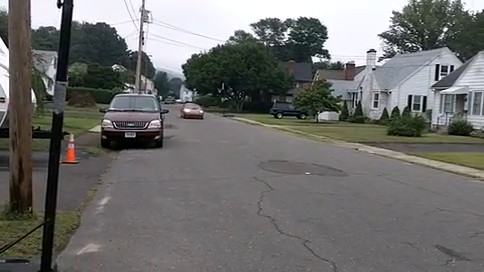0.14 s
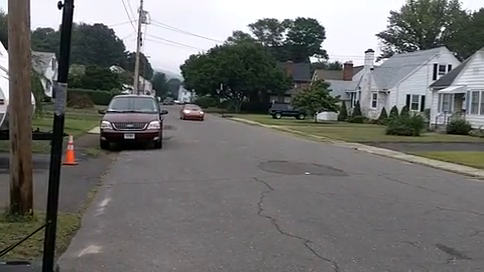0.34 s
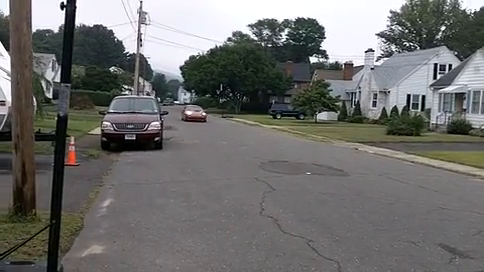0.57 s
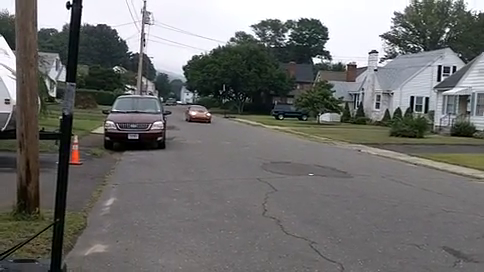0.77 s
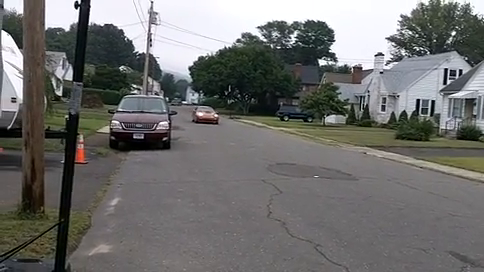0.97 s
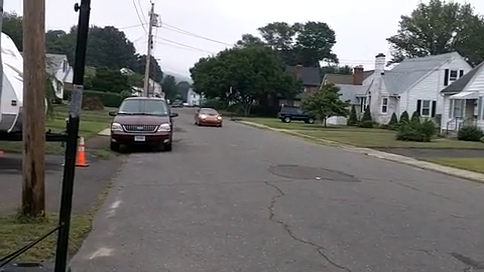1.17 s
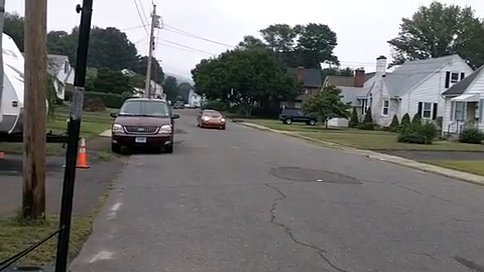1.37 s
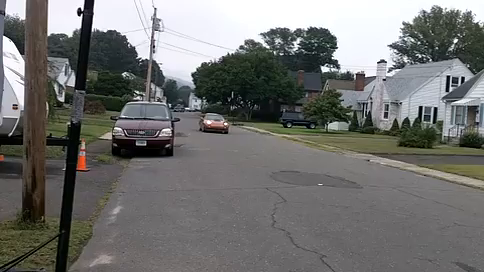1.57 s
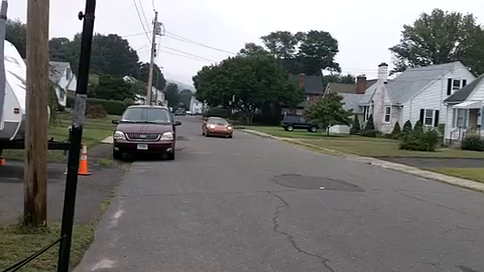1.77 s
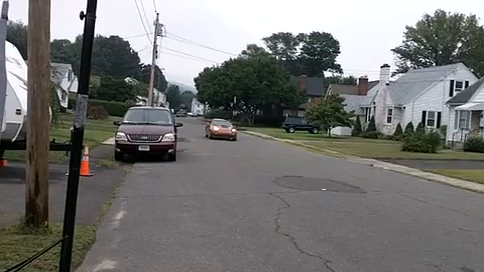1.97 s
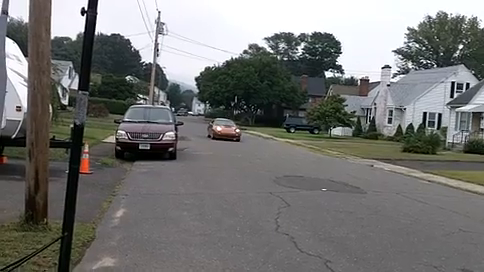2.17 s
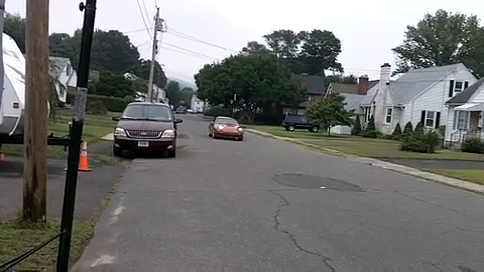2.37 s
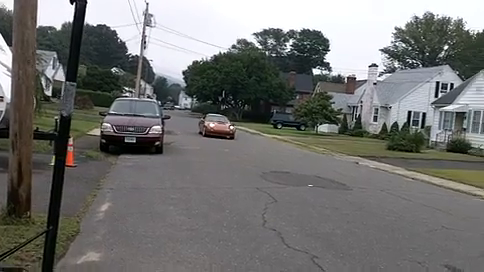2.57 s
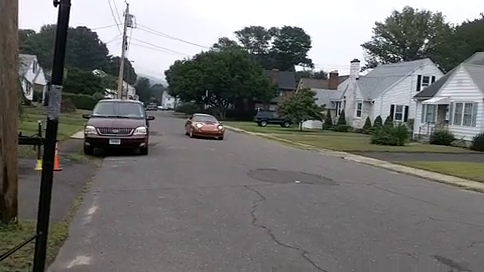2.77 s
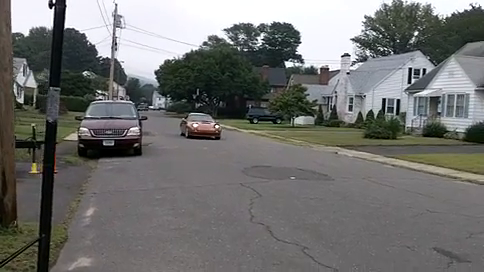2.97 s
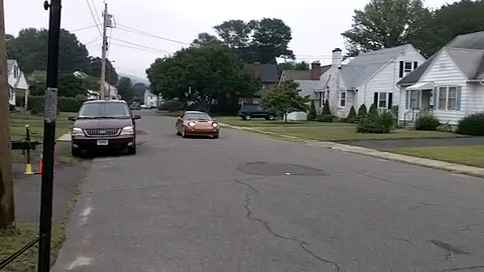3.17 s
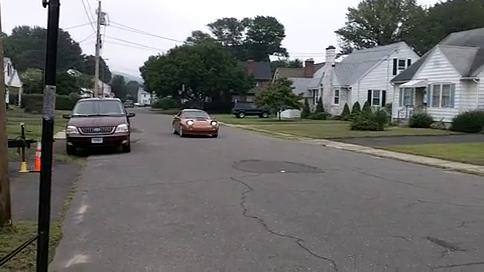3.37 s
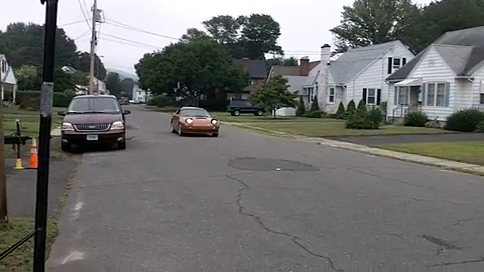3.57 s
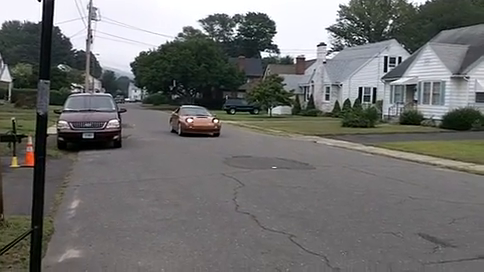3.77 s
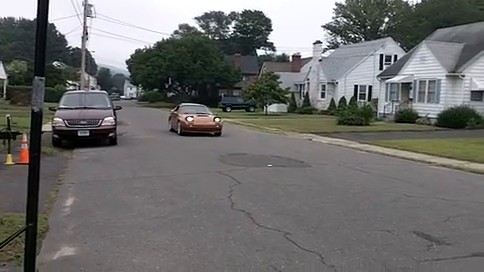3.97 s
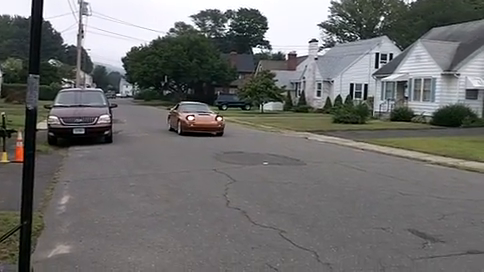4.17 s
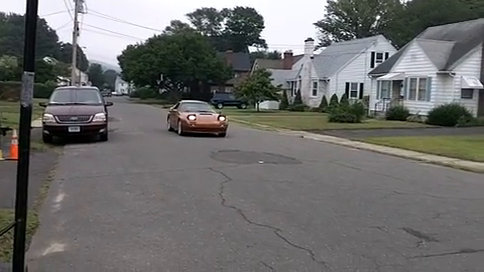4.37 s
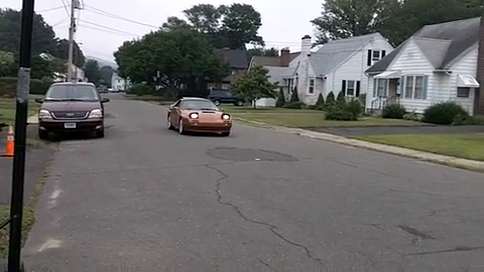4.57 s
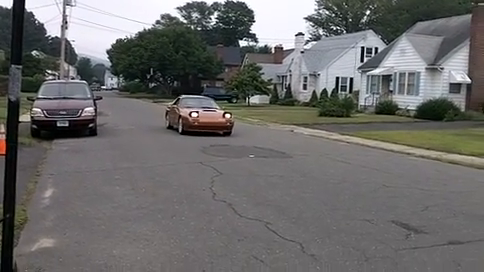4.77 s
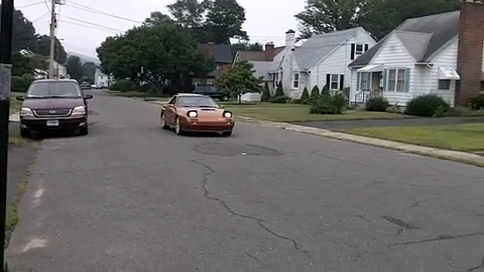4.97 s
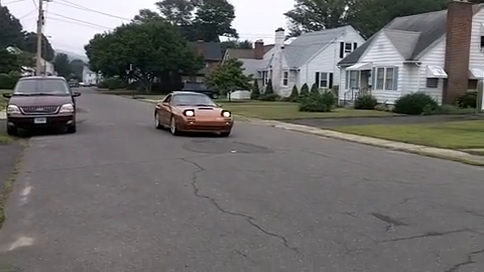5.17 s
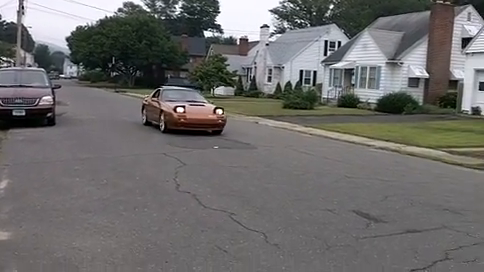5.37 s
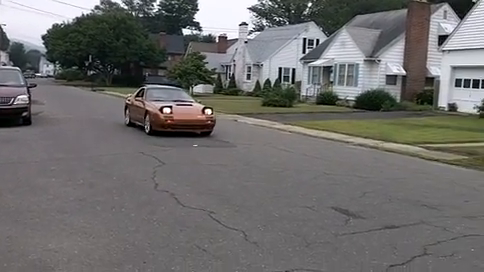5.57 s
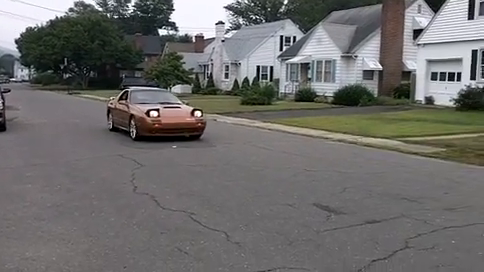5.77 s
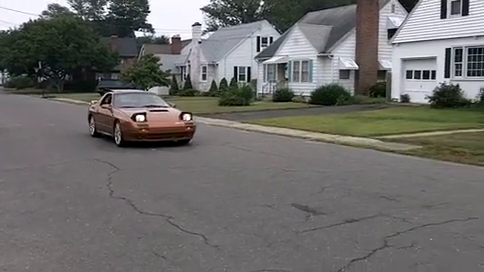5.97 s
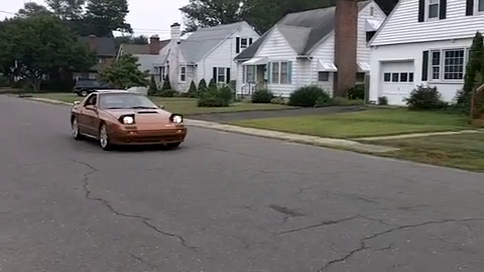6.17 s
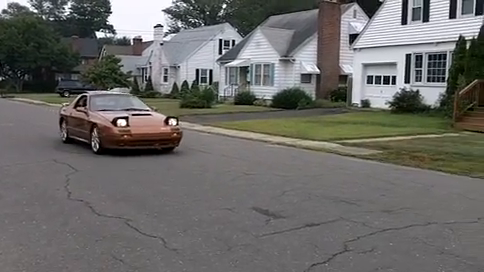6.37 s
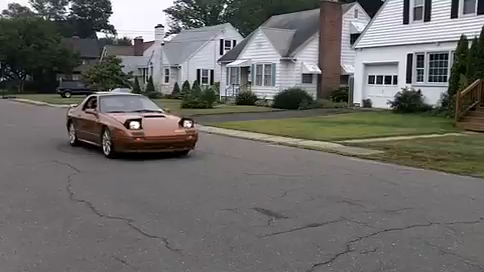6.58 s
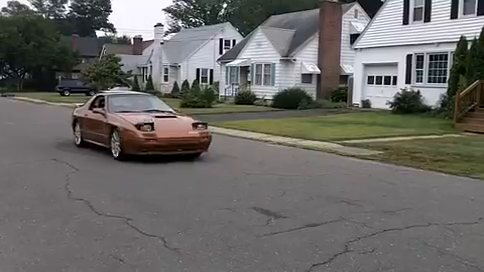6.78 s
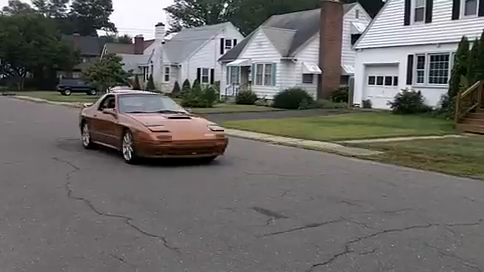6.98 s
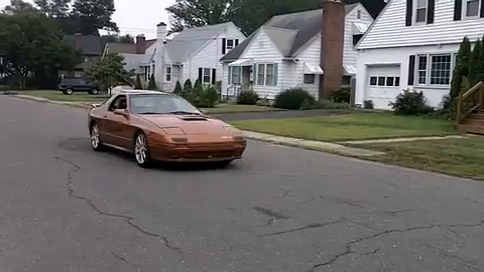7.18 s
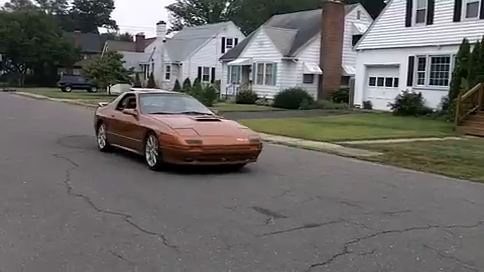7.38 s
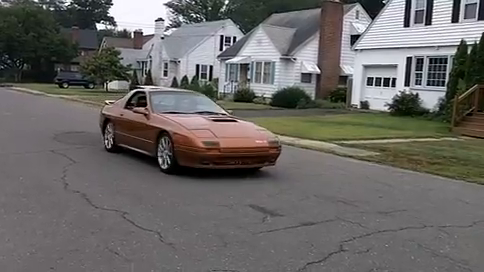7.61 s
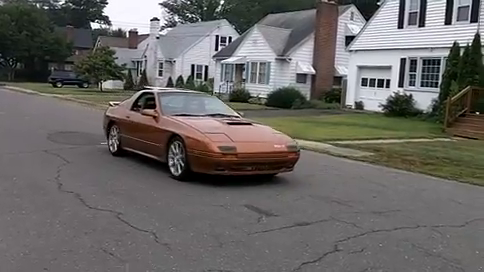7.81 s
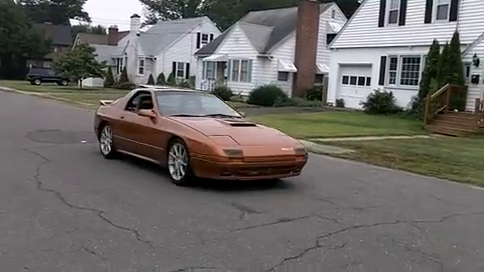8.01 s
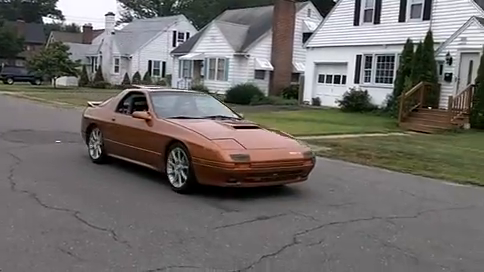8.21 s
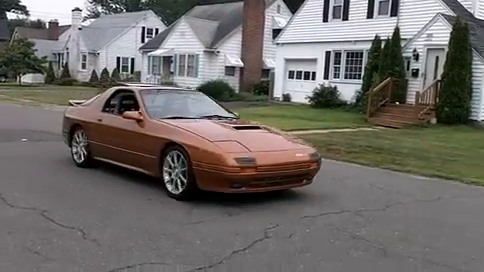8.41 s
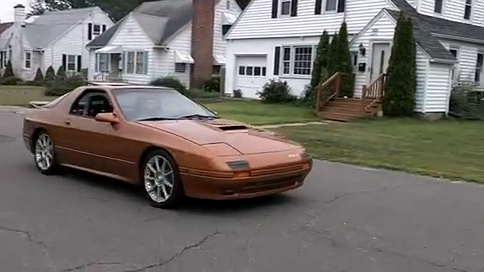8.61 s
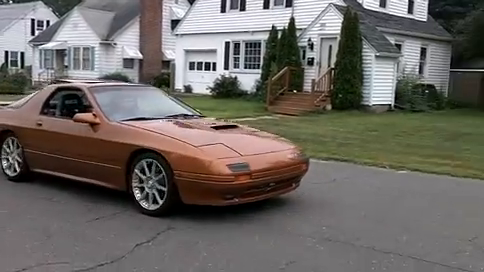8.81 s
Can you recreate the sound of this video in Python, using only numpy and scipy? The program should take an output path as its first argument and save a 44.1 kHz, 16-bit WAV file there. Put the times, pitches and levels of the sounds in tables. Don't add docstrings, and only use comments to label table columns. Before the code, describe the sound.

Outdoors on a quiet residential street, one handheld microphone hears a car's low exhaust drone. A very loud sharp backfire cracks early, another follows around two and a half seconds, with thin echoes off houses. The drone stumbles and slides down in pitch, with small dull pops, to a lumpy near-idle as tyre hiss and gritty crackle grow nearer. Faint bird chirps come at the start.

```python
import sys
import numpy as np
from scipy import signal
from scipy.fft import rfft, irfft, next_fast_len
from scipy.io import wavfile

SR = 44100
rng = np.random.default_rng(int(sys.argv[2]) if len(sys.argv) > 2 else 0)


def master(y):
    cut = np.clip(np.atleast_2d(y).T, -1, 1)
    pcm = np.round(cut * 32767)
    wavfile.write(sys.argv[1], SR, pcm.astype(np.int16))


def boost(x):
    u = np.asarray(x, float) / 20
    return 10 ** u


N = 390285

# f/Hz, density/dB per Hz
HUSH_SPECTRUM = [(30, -7.5), (60, -2.5), (120, 8.5), (220, -21), (400, -13), (700, -22.5), (1100, -12),
                 (1400, -16.5), (2100, -15.5), (3300, -19), (4900, -22), (5200, -37.5), (6500, -43.5),
                 (9000, -65)]
# t/s, length/s, from f/Hz, to f/Hz, level/dB
CHIRPS = [
    (.065, 0.032, 4800, 3800, -58),
    (.225, 0.028, 5200, 6330, -62),
    (.795, 0.023, 5000, 5400, -60),
    (0.798, .04, 6300, 6100, -64),
    (.82, .02, 5300, 5000, -62),
]
# peak t/s, level/dB, half length/s
GUSTS = [
    (.95, -54, .2),
    (1.87, -47, .15),
    (2.7, -43, .15),
    (4.4, -44.5, .6),
    (5.44, -37, .15),
    (6.15, -49, .45),
    (6.8, -42, .08),
    (7.25, -28, .3),
    (8.75, -30, .08),
]
# t/s, level/dB
ROLLING_LEVEL = [(0, -71.5), (1.3, -71.5), (1.9, -69.5), (3.0, -67.5), (5.15, -67), (6.45, -67.5),
                 (7.6, -63.5), (8.2, -59.5), (8.85, -59)]
# f/Hz, density/dB per Hz
ROLLING_SPECTRUM = [(60, 40.5), (120, 39), (200, 32.5), (350, 30.5), (700, 20.5), (1200, 16.5), (2000, 13),
                    (3500, 20.5), (4900, 12.5), (5200, 6.5), (6500, 3.5), (9000, -10.5), (12500, -6),
                    (15000, -10.5)]
# f/Hz, width/Hz, level/dB over the tyres
RASP = [(385.6, 84, 18), (691, 99, 14)]
# from t/s, to t/s, f/Hz, width/Hz, level/dB
BRAKE = (5.2, 6.35, 3400, 260, -54)
# t/s, peak level/dB, rattle/dB relative to the spike, rattle length/ms, top f/Hz
BACKFIRES = [(0.4794, -0.5, -10, 1.04, 7900), (0.481, -16, 14, 1.46, 5500), (0.491, -25, -16, 3, 5000),
             (.576, -29.5, -19, 20, 6000), (2.6238, -15, -15, 3.7, 6900), (2.6234, -3.5, -3, 1.07, 3000),
             (2.6263, -12, -27, 1.8, 5000), (2.629, -30, 5, 4.2, 2500), (2.644, -46, -9, 4, 4940),
             (2.6655, -30, 1, 1.4, 12000), (2.668, -27.5, 15, 2.3, 2500), (2.678, -33, 2, 3.1, 12000),
             (3.792, -36, -18, 5, 1490), (5.91, -28.5, 6, 3.8, 990), (5.925, -35.5, 10, 13, 1400),
             (6.218, -33.5, 12.5, 19, 1800), (6.7782, -23.5, 10.5, 4, 1600), (6.7837, -20.5, -12, 5, 4040),
             (8.123, -36, -2, 5.5, 2000)]
# f/Hz, width/Hz, level/dB
MOUTH = [(467, 335, 7), (1212, 280, 1), (2050, 420, 7.5), (3170, 640, 1), (3910, 390, 5), (4530, 140, -20),
         (6640, 500, -33), (11800, 5000, -11.5)]
# t/s, firings per s
SPEED = [(0, 95), (1.65, 93.3), (3.22, 90.6), (3.7, 86), (4.5, 76.3), (4.95, 70.6), (5.35, 64.2),
         (6.04, 54.7), (6.68, 46.8), (7.04, 42.6), (7.3, 39.4), (7.64, 38.9), (7.79, 42.3), (7.99, 37.6),
         (8.24, 44.2), (8.4, 41.7), (8.65, 46.2), (8.85, 43)]
# t/s, thump on the firing rate level/dB, pulse edge feeding overtones level/dB
DRIVE = [(0, -32, -27.5), (.35, -33.5, -28.5), (.62, -40.5, -27.5), (1.0, -35, -30), (1.6, -35, -28.5),
         (2.3, -40, -24), (2.65, -38.5, -33), (3.2, -31.5, -25.5), (3.37, -21.5, -27), (4.25, -24.5, -27),
         (4.76, -27, -29.5), (4.83, -33, -27), (5.25, -29, -24.5), (5.5, -39, -22), (6.1, -32.5, -28.5),
         (6.75, -35, -27), (7.4, -46, -31.5), (8.85, -38, -23)]
# f/Hz, level/dB
SILENCER = [(78, -4.5), (95, 5), (125, 0), (160, -11), (214, -17.5), (228, -36.5), (285, -34), (370, -45)]
# f/Hz, level/dB
TAILPIPE = [(180, 8), (214, 2), (230, -18), (285, -11), (325, -1), (385, 0), (410, -15), (570, -17),
            (700, -30)]
# t/s, level/dB
SINGING = [(0, -52), (3.25, -53), (3.4, -66), (5.2, -63), (5.4, -50), (5.9, -53), (6.1, -48), (6.6, -48),
           (7.05, -52), (7.6, -52), (7.9, -46), (8.85, -46)]
# t/s, f/Hz, depth/dB
CANCELS = [(1.77, 93, -20), (2.76, 92, -9), (3.42, 177, -5), (3.62, 174, 1), (4.5, 152, -14.5),
           (5.64, 120, -4.5), (6.0, 110, -9.5), (6.24, 104, -3), (7.33, 79, -12), (7.63, 78, -3),
           (8.0, 76, -8), (8.38, 84, -2), (8.25, 132, -0.5), (8.62, 138, -3), (7.5, 156, -24)]
# f/Hz, width/Hz, level/dB
PIPE = [(55.7, 46, -1), (100.6, 28.9, 2.5), (129.2, 43.7, 1.5), (188.1, 32.4, -2.5)]
# t/s, misses, peak level/dB of the missing pulse
MISFIRES = [(1.167, 1, -14), (1.545, 1, -11), (1.983, 1, -26), (2.338, 1, -23), (3.154, 1, -9.5),
            (3.275, 1, -24), (3.39, 1, -17.5), (3.436, 1, -10), (3.49, 1, -15), (3.763, 1, -5.5),
            (3.882, 1, -9), (3.905, 3, -11), (4.079, 5, -5), (4.358, 1, -14.5), (4.384, 2, -8),
            (4.542, 1, -7), (4.567, 1, -17), (4.619, 1, -6), (4.651, 1, -10.5), (4.714, 1, -15),
            (4.761, 1, -10), (6.729, 1, -16.5), (6.773, 1, -8), (7.095, 1, -22), (8.765, 1, 2.5),
            (8.811, 1, -10)]
# t/s, pops, peak level/dB of the extra pulse
POPS = [(.299, 1, -16), (.928, 1, -14), (1.078, 1, -17), (1.377, 1, -14), (1.485, 2, -21), (1.593, 1, -22),
        (1.828, 2, -10), (2.435, 2, -16), (2.543, 2, -11.5), (2.672, 3, -12), (2.85, 1, -13),
        (3.11, 1, -15)]
# from t/s, to t/s, peak level/dB of the shortfall
LIMPS = [
    (3.30, 3.62, -26),
    (3.64, 3.88, -29),
    (3.905, 4.06, -30),
    (4.081, 4.34, -25.5),
    (4.382, 4.52, -25),
    (4.564, 4.77, -25.5),
    (6.817, 6.90, -28),
    (7.0, 7.07, -17),
    (7.19, 7.66, -15),
]
# order of the firing rate, level/dB, gone at t/s, fade/s
WHINE = [(12, -58.5, 5.0, 1.6), (24, -58.5, 3.38, .06)]
# f/Hz, level/dB
MOTOR_LINES = [(13965, -97), (14565, -94)]
# f/Hz, width/Hz, depth left (0-1)
MIC_DIPS = [(2700, 1000, .025), (5490, 650, .05), (7900, 2600, .08), (10940, 850, .1), (3650, 300, .55)]


def rms_one(x):
    return x / np.sqrt(np.mean(x ** 2) + 1e-20)


def in_time(rows):
    s, *columns = np.transpose(rows)
    return [np.interp(np.arange(N) / SR, s, c) for c in columns]


def at_hz(points, hz):
    f, db = np.transpose(points)
    return np.interp(np.log(hz), np.log(f), db)


def bump(x):
    return np.exp(-x ** 2)


def drift(rate):
    r = np.exp(-80 * np.pi * rate / SR)
    white = rng.standard_normal(N // 40 + 2002)
    slow = rms_one(signal.lfilter([1], [1, -2 * r, r * r], white)[2000:])
    return np.interp(np.arange(N) / 40, np.arange(len(slow)), slow)


def coloured(spectrum):
    size = next_fast_len(N)
    hz = np.maximum(np.arange(size // 2 + 1) * SR / size, 1)
    below = np.minimum(hz / spectrum[0][0], 1) ** 2
    bins = rfft(rng.standard_normal(size))
    return irfft(bins * boost(at_hz(spectrum, hz)) * below, size)[:N]


def resonance(x, hz, width):
    r = np.exp(-np.pi * width / SR)
    poles = [1, -2 * r * np.cos(2 * np.pi * hz / SR), r * r]
    return signal.lfilter([(1 - r * r) / 2, 0, (r * r - 1) / 2], poles, x)


def street_hush():
    return boost(-45 + 1.6 * drift(0.46)) * rms_one(coloured(HUSH_SPECTRUM))


def birds():
    out = np.zeros(N)
    for s, length_s, from_hz, to_hz, db in CHIRPS:
        n, i = int(length_s * SR), int(s * SR)
        phase = 2 * np.pi * np.cumsum(np.linspace(from_hz, to_hz, n)) / SR
        out[i:i + n] += boost(db) * np.hanning(n) * np.sin(phase)
    return out


def gust_rumble():
    t = np.arange(N) / SR
    level = boost(-60.5) + sum(boost(db) * bump((t - s) / half_s) for s, db, half_s in GUSTS)
    band = signal.butter(2, [17, 38], "band", fs=SR, output="sos")
    return rms_one(signal.sosfilt(band, rng.standard_normal(N))) * level * boost(-10.0)


def tyres_and_fan(roll_db):
    return coloured(ROLLING_SPECTRUM) * boost(roll_db + 4.0 + 1.3 * drift(5.0))


def grit(roll_db):
    grains_per_s, spread_db = 150, 4
    near = boost(roll_db - roll_db.max())
    hits = rng.random(N) < grains_per_s * near / SR
    size = boost(spread_db * np.minimum(rng.exponential(1, N), 4))
    snaps = hits * size * rng.choice([-1, 1], N)
    bright = signal.butter(2, 8500, "high", fs=SR, output="sos")
    return boost(roll_db - 3.5 + 10.5) * signal.sosfilt(bright, snaps + 1e-18)


def brake_hiss():
    start, end, hz, width, db = BRAKE
    pressed = np.interp(np.arange(N) / SR, [start, end - .3, end], [0, 1, 0])
    hiss = resonance(resonance(rng.standard_normal(N), hz, width), hz, width)
    return boost(db + 1.2 * drift(15)) * pressed * rms_one(hiss)


def engine_rasp(firings, roll_db):
    white = rng.standard_normal(N)
    rasp = sum(boost(db) * rms_one(resonance(white, hz, width)) for hz, width, db in RASP)
    throb = 1 + 0.32 * np.cos(2 * np.pi * firings)
    return rasp * throb * boost(0.89 * (roll_db + 65.5) - 70.0 + drift(3.3))


def gear_whine(firings):
    out = np.zeros(N)
    for order, db, until_s, fade_s in WHINE:
        pulling = np.clip((until_s - np.arange(N) / SR) / fade_s, 0, 1)
        out += pulling * boost(db + 3.0 * drift(6.2)) * np.sin(2 * np.pi * order * firings)
    return out


def backfires():
    out, t = np.zeros(N), np.arange(SR // 2) / SR
    tail_db, t60_s = -39.5, 0.83
    spike = np.exp(-.5 * ((t - .0003) / .00006) ** 2)
    tail_level = boost(tail_db - 60 * t / t60_s) * (t > .004)
    for s, db, rattle_db, length_ms, top_hz in BACKFIRES:
        noise = rng.standard_normal((2, len(t)))
        rattle = noise[0] * (t > .0006) / (1 + (t / length_ms * 1000) ** 8)
        tail = signal.lfilter([.4], [1, -.6], noise[1]) * tail_level
        push = spike + boost(rattle_db - 4.0) * rattle + tail
        dull = signal.lfilter(*signal.butter(2, min(top_hz, 15000), fs=SR), push)
        bang = sum(boost(ring_db) * resonance(dull, hz, width) for hz, width, ring_db in MOUTH)
        bang = signal.lfilter(*signal.butter(2, 267, "high", fs=SR), bang)
        i = int(s * SR)
        out[i:i + len(t)] += boost(db) * (bang / np.abs(bang).max())[:N - i]
    return out


def pipe_pulse():
    t = np.arange(SR // 8) / SR
    rings = sum(boost(db) * np.exp(-np.pi * width * t) * np.sin(2 * np.pi * hz * t)
                for hz, width, db in PIPE)
    open_end = signal.butter(2, 42, "high", fs=SR, output="sos")
    pulse = signal.sosfilt(open_end, rings * (1 - np.exp(-t / 0.0043)))
    silencer = signal.cheby2(6, 28, 225, fs=SR, output="sos")
    pulse = signal.sosfilt(silencer, pulse)
    return pulse / np.abs(pulse).max()


def order_level(k, rate):
    t, hz = np.arange(N)[::64] / SR, k * rate[::64]
    s, thump_db, edge_db = np.transpose(DRIVE)
    db = np.interp(t, *np.transpose(SINGING)) + at_hz(TAILPIPE, hz)
    if k == 1:
        db = np.interp(t, s, thump_db)
    elif k < 5:
        db = np.maximum(np.interp(t, s, edge_db) + at_hz(SILENCER, hz), db)
    if k < 5:
        for at_s, lost_hz, depth_db in CANCELS:
            db = db + depth_db * bump((t - at_s) / 0.084) * bump((hz - lost_hz) / 14)
    waver_db = 1 if k < 4 else 1.5
    return np.repeat(db, 64)[:N] + waver_db * drift(3.0)


def firing_run(firings, s, count):
    first = np.round(firings[int(s * SR)])
    return np.searchsorted(firings, first + 4 * np.arange(int(count)))


def missing_pulses(firings):
    delay_s = .005
    gaps = np.zeros(N + 1)
    for s, misses, db in MISFIRES:
        gaps[firing_run(firings, s - delay_s, misses)] = boost(db - 11.5)
    for s, pops, db in POPS:
        gaps[firing_run(firings, s, pops)] -= boost(db - 15.0)
    for start, end, db in LIMPS:
        first = np.round(firings[int((start - delay_s) * SR)])
        weak = np.arange(first, firings[int(end * SR)], 2)
        gaps[np.searchsorted(firings, weak)] += boost(db + .8 * rng.standard_normal(len(weak)))
    return gaps


def exhaust(firings, rate):
    pulse = pipe_pulse()
    pipe_phase = np.unwrap(np.angle(rfft(pulse, SR)))[:1000]
    drone = np.zeros(N)
    for k in range(1, 17):
        level = np.sqrt(2) * boost(order_level(k, rate))
        lag = np.interp(k * rate, np.arange(len(pipe_phase)), pipe_phase)
        drone += level * np.cos(2 * np.pi * k * firings + lag)
    return drone - signal.fftconvolve(missing_pulses(firings), pulse)[:N]


def scene():
    (rate,), (roll_db,) = in_time(SPEED), in_time(ROLLING_LEVEL)
    firings = np.cumsum(rate) / SR
    street = street_hush() + birds() + gust_rumble()
    rolling = tyres_and_fan(roll_db) + grit(roll_db) + brake_hiss()
    engine = engine_rasp(firings, roll_db) + gear_whine(firings)
    pipe = backfires() + exhaust(firings, rate)
    return (street + rolling + engine + pipe)[None]


def band_limit(x):
    return signal.sosfilt(signal.butter(12, 15780, fs=SR, output="sos"), x)


def record(dry):
    t = np.arange(N) / SR
    x = dry + sum(boost(db + 5.0 * drift(20)) * np.sin(2 * np.pi * hz * t) for hz, db in MOTOR_LINES)
    for hz, width, left in MIC_DIPS:
        pole = np.exp(-np.pi * width / SR)
        zero = 1 - np.clip(left, 0, 1) * (1 - pole)
        c = 2 * np.cos(2 * np.pi * hz / SR)
        x = signal.lfilter([1, -zero * c, zero ** 2], [1, -pole * c, pole ** 2], x)
    x = signal.sosfilt(signal.cheby2(14, 26, 15340, fs=SR, output="sos"), x)
    return band_limit(np.clip(x, -1, 1))


dry = scene()
out = record(dry)
master(out)
```